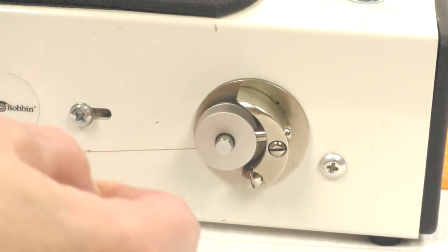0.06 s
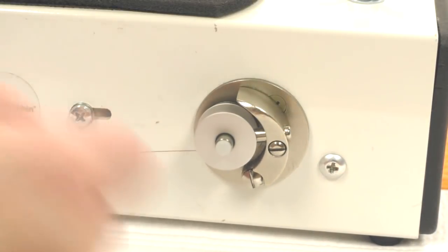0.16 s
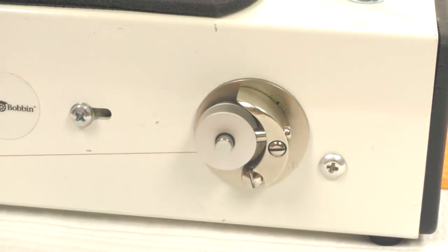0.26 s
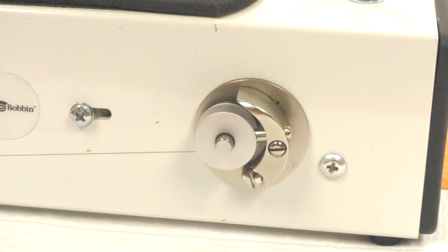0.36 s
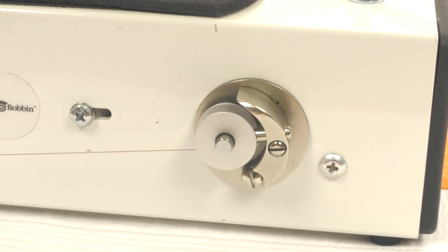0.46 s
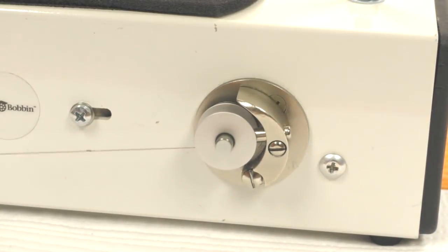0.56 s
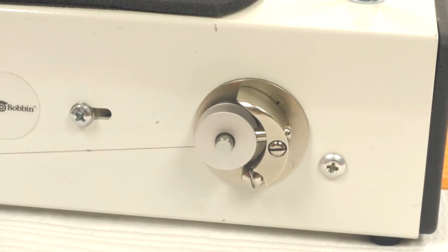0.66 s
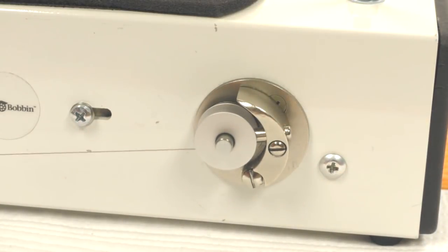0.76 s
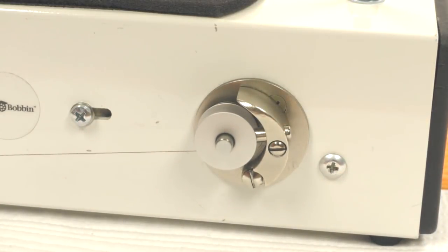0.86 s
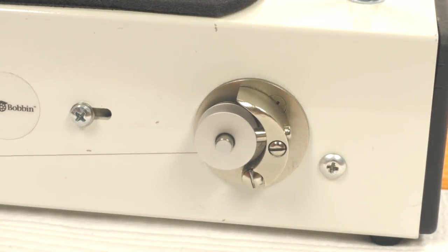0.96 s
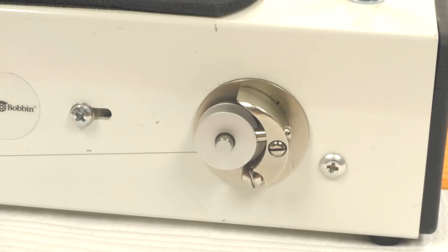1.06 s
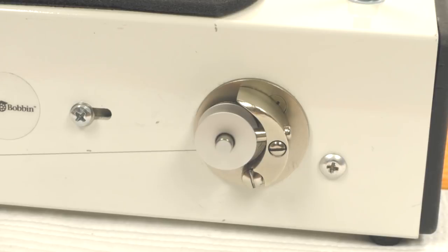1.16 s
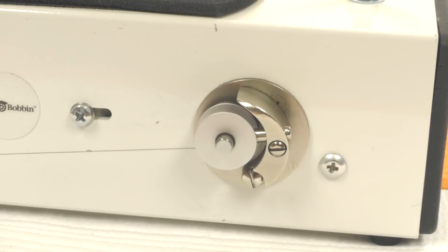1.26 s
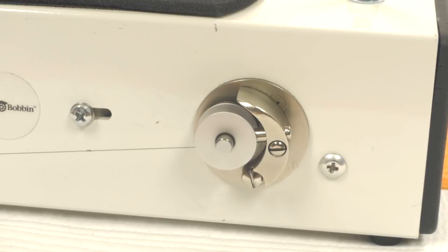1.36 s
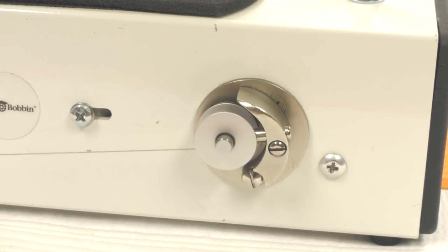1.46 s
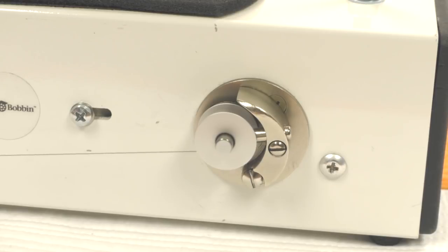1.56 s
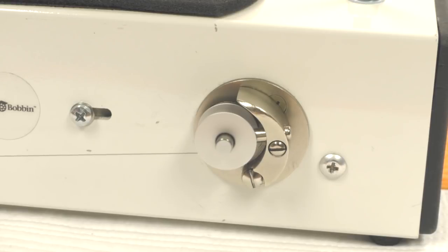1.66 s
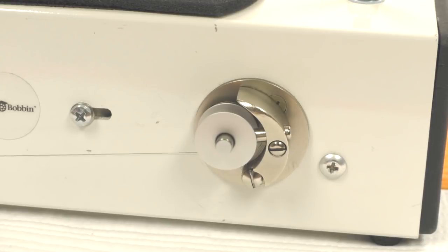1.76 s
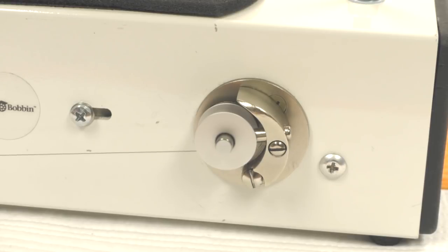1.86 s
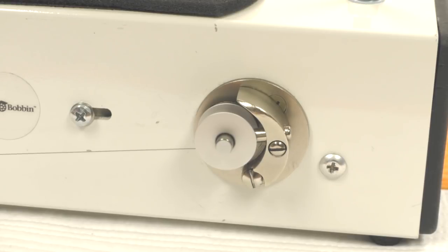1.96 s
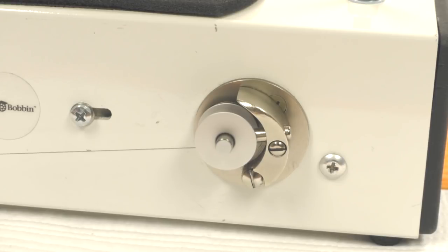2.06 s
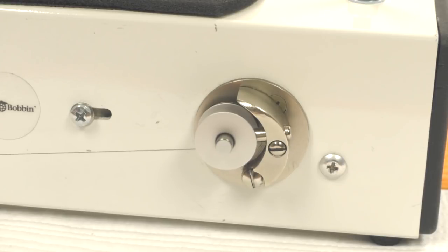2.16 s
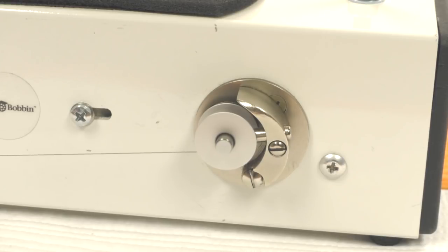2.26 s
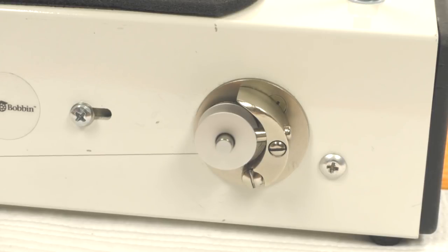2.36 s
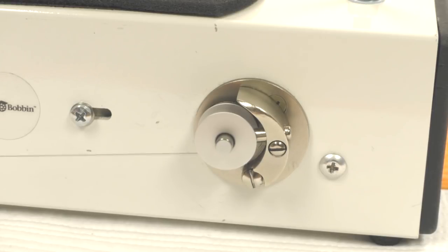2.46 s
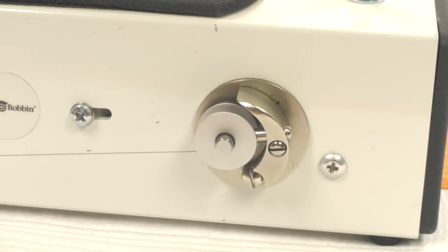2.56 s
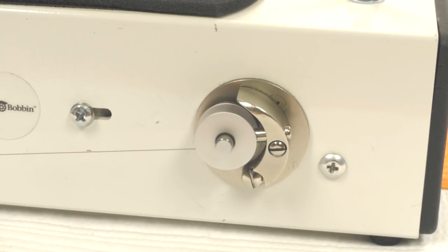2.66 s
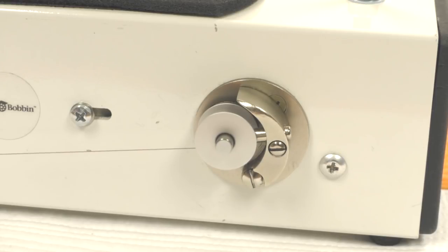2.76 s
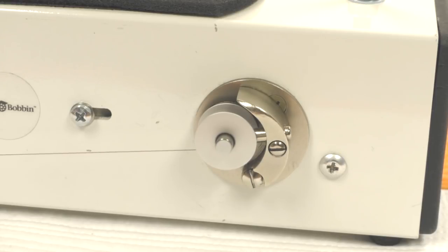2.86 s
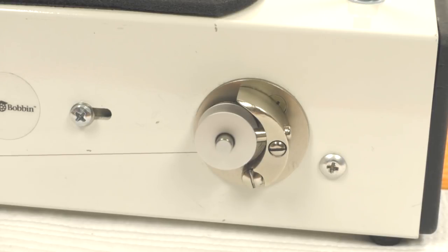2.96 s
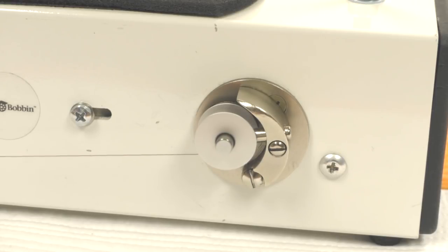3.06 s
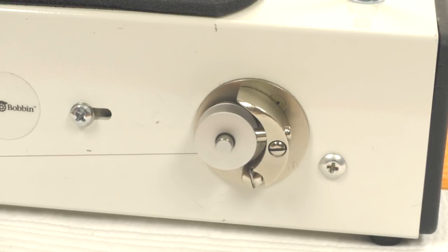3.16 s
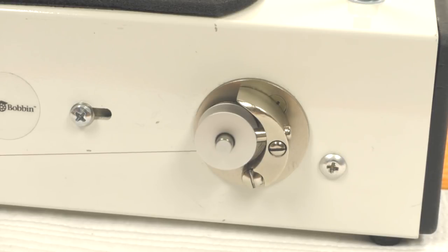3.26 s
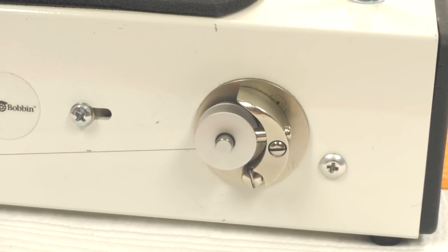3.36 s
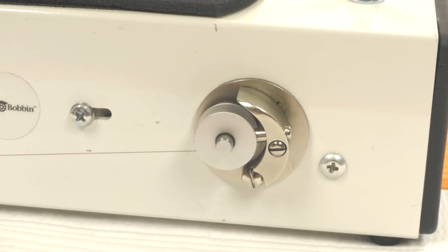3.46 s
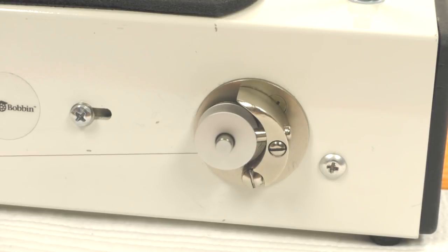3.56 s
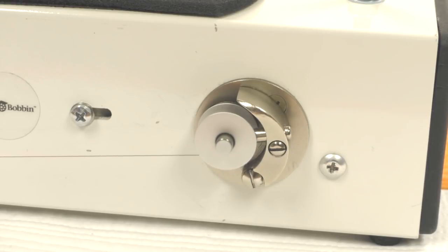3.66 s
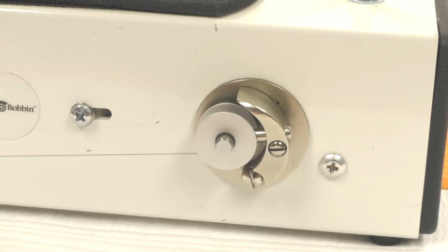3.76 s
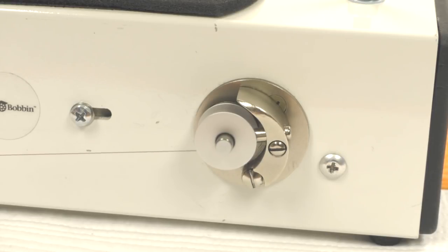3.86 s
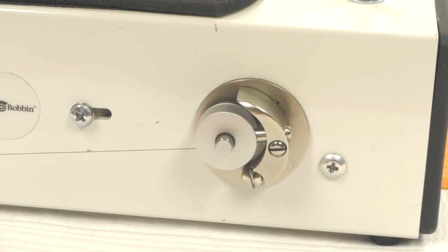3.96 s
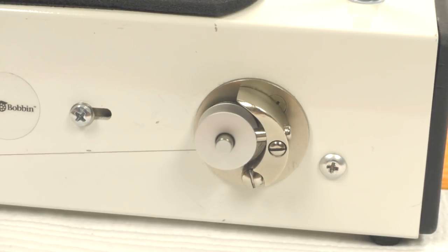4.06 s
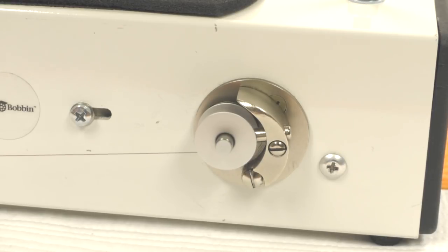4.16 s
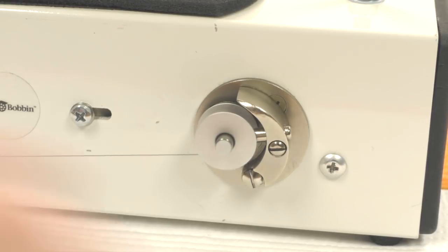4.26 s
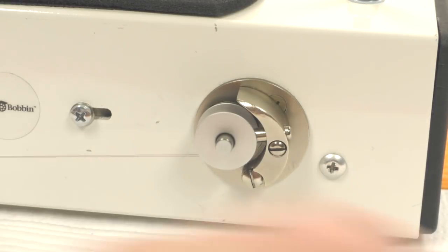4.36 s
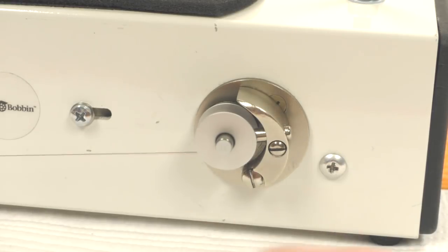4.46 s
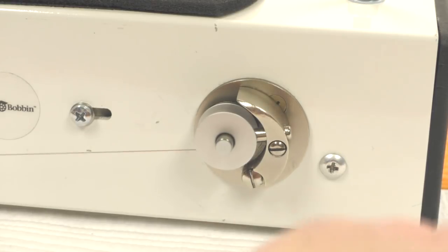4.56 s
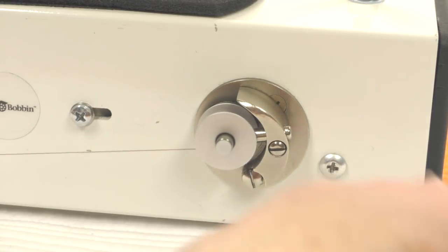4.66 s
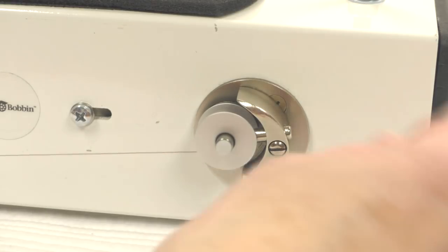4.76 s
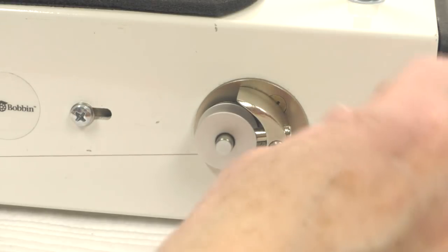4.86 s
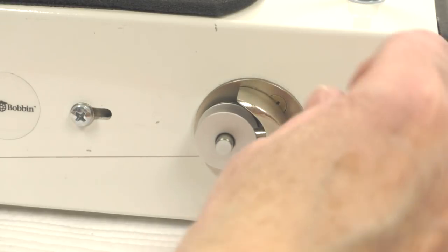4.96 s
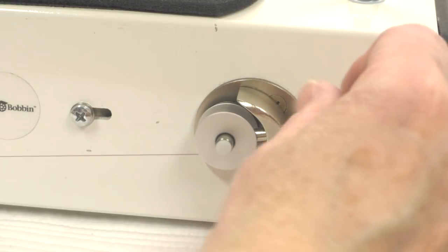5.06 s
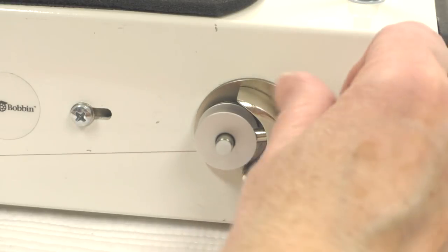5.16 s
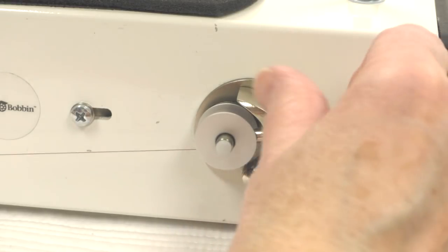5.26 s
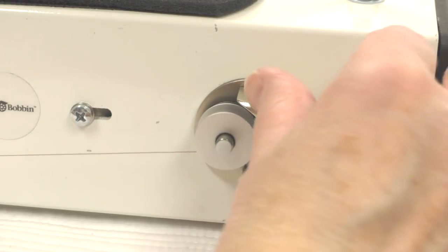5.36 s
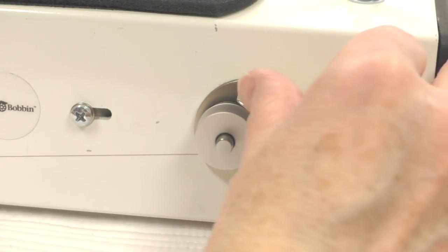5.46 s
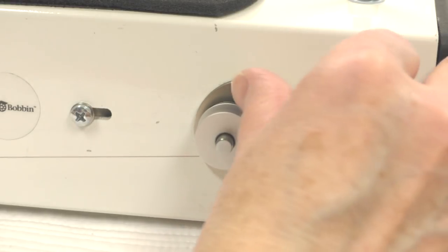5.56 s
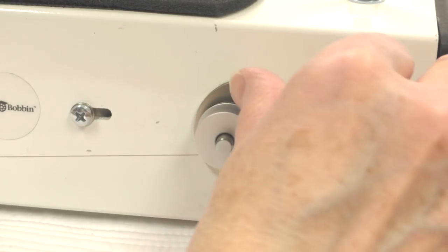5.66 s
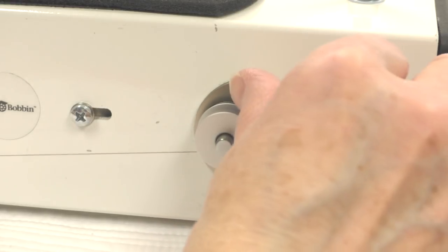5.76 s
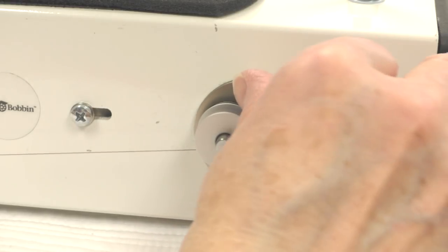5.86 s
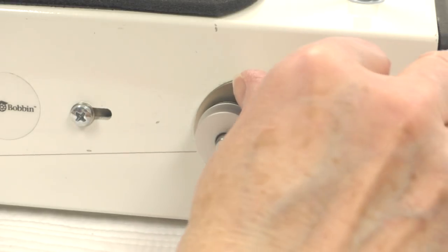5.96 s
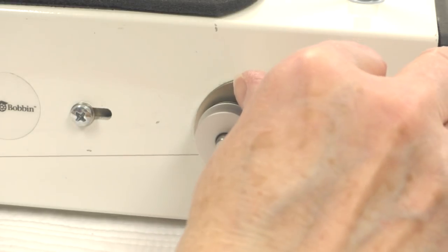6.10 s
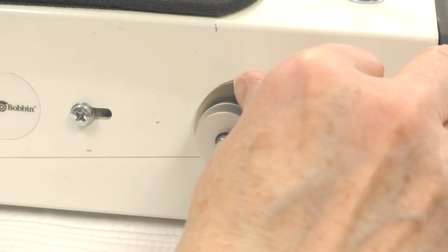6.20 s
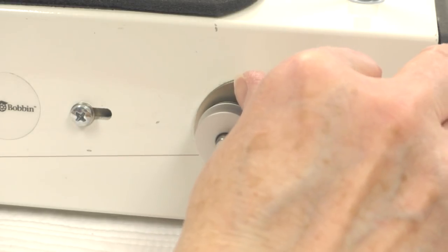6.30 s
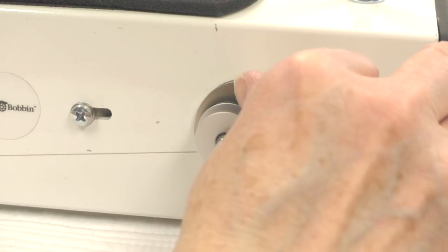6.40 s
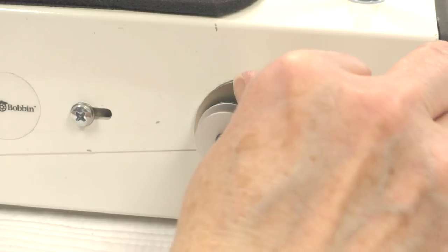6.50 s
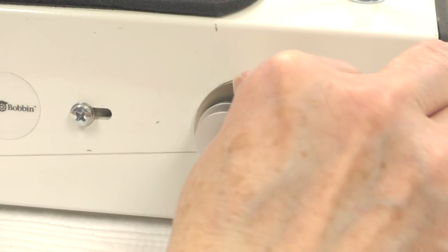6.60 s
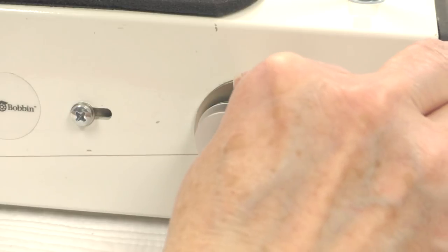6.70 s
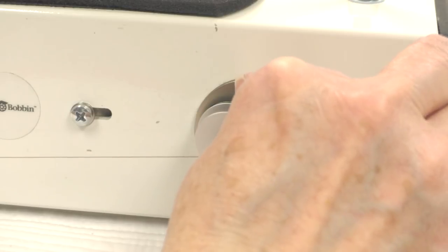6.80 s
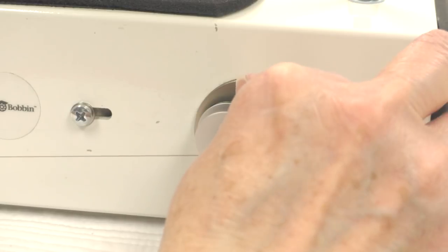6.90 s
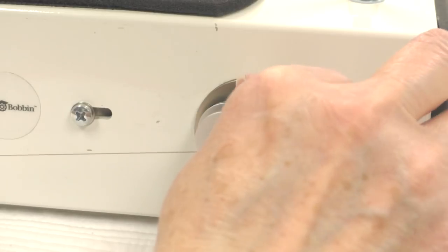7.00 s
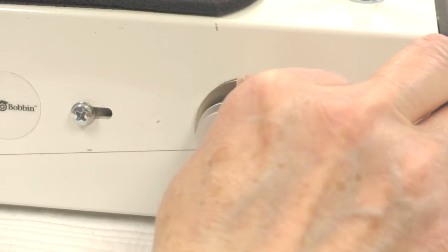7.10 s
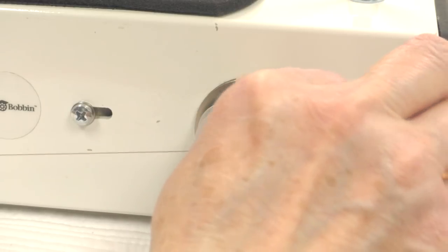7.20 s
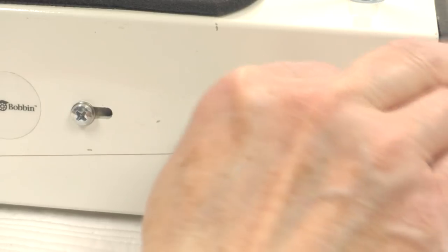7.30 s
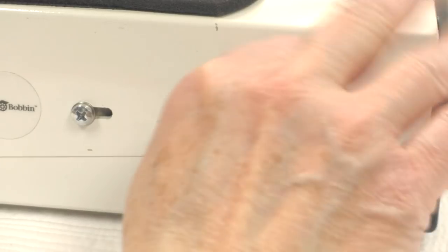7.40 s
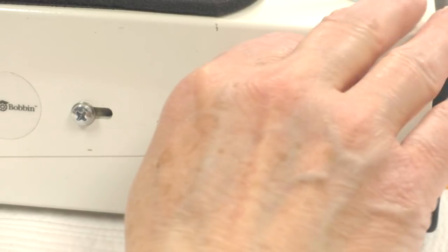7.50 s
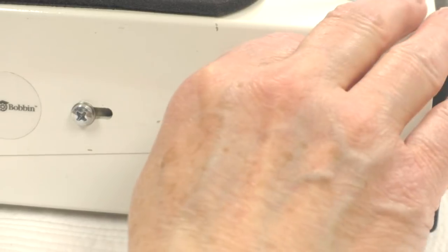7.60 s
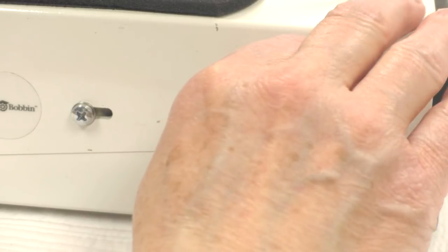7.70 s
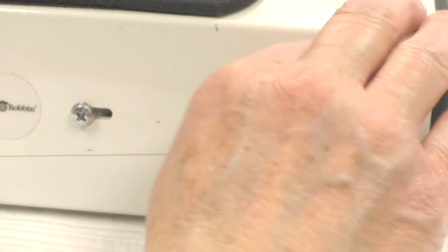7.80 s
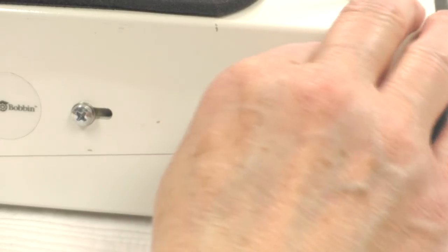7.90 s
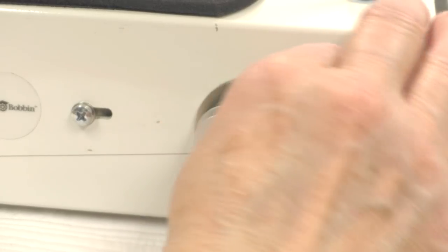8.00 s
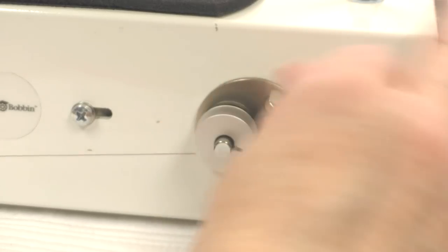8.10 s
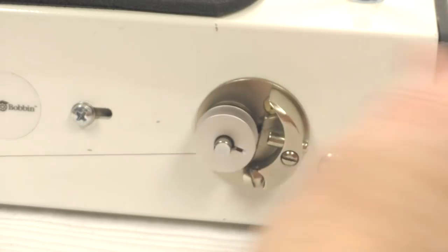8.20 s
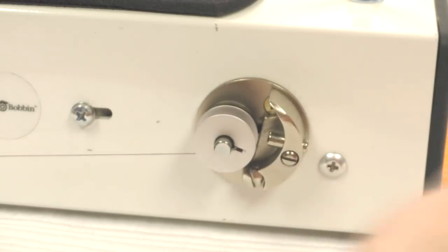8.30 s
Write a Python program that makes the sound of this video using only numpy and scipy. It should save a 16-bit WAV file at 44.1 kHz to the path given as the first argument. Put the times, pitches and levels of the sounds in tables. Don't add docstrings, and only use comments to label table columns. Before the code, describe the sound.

From 0 s a small brush motor is already running, close and dry in a quiet room: gritty belt rumble centred in the mids, a low buzzing whine and airy brush hiss, shaking a thin metal case. Until about 0.9 s a moving hand adds soft low thumps and air buffeting, with several loose spindle knocks. The whir then settles slightly quieter, pitch creeping upward. Bright tiny thread ticks come in short waves roughly every 0.7 s; knocks thin out between 2.4 and 4.6 s. From about 4.7 s the hand returns, stirring air, colouring the hiss and bringing a fuller, louder whir with more frequent knocks and sharper, drier ticks through 7.7 s. At 7.84 s a lever snaps with a hard metallic double click and small rattle. Rumble and hiss vanish quickly, leaving a clean whine gliding down in pitch, with faint hand bumps, still sounding at the end near 8.3 s.

```python
import sys
import numpy as np
from scipy import signal
from scipy.fft import rfft, irfft, next_fast_len
from scipy.io import wavfile
from scipy.ndimage import map_coordinates

SR = 44100
rng = np.random.default_rng(int(sys.argv[2]) if len(sys.argv) > 2 else 0)


def digitize_waveform(pressure):
    field = np.atleast_2d(pressure).T
    bounded = np.clip(field, -1, 1)
    quanta = np.round(bounded * 32767).astype(np.int16)
    wavfile.write(sys.argv[1], SR, quanta)


def voltage_ratio(decibels):
    exponent = np.asarray(decibels, float) / 20
    return 10 ** exponent


N = 367838
T = np.arange(N) / SR

# time in seconds, commutator steps per second.
SPEED = [(0, 201.5), (.4, 205.3), (.6, 206.6), (1.5, 208.3), (3, 211.6), (5.5, 217.1), (7.2, 220.7),
         (7.85, 221.9), (8.22, 164.5), (8.34, 147.6)]
BOBBIN_TURNS, BELT_TURNS = .3466, 1 / 9.25
# frequency in Hz, level in dB per Hz.
LOWER_BAND = [(180, -58), (300, -20.5), (328, -24), (417, -6.5), (433, -19), (477, -24.5), (506, -16.5),
              (575, -4), (671, -10), (725, -8.5), (869, -7.5), (1000, 1.5), (1120, 3), (1350, -13),
              (1400, -8.5), (1820, -36), (3080, -120)]
# time in seconds, peak in dB.
KNOCKS = [(0.1181, -17), (0.171, -17), (0.189, -11.5), (0.3125, -14), (0.3701, -15), (0.412, -12),
          (0.4419, -17), (0.7752, -16), (1.2565, -15.5), (1.3443, -20), (1.5244, -15), (1.5663, -16),
          (1.5893, -12.5), (1.9265, -19), (2.0832, -17), (2.0971, -12.5), (2.2619, -17), (2.3166, -19),
          (2.825, -28), (4.68, -18), (4.8745, -18), (4.8973, -14), (5.0746, -16), (5.1856, -17),
          (5.3737, -16), (5.3944, -12), (5.4993, -18), (5.7059, -16), (5.8381, -20), (5.862, -17),
          (5.9838, -14), (6.2442, -22), (6.3064, -16), (6.3495, -17), (6.451, -13), (6.662, -13),
          (6.8763, -14), (6.9755, -14), (7.0683, -16), (7.1077, -12.5), (7.1668, -18), (7.2712, -12),
          (7.5384, -25), (7.5905, -20)]
# time in seconds, case ring in dB, sharp crack in dB.
SNAPS = [
    (7.8388, -11, -33),
    (7.843, -4, -23.5),
    (7.8466, -22, -29),
    (7.853, -12, -35),
    (7.856, -22, -39),
    (7.863, -23, -42),
]
LET_GO_S = SNAPS[0][0]
# time in seconds, colour (0 open, 1 mid, 2 hand).
HISS_MOVE = [(1.7, 0), (2.05, 1), (3.9, 1), (4.9, 2)]


def unit(x):
    return x / np.sqrt(np.mean(x ** 2) + 1e-20)


def curves(rows):
    s, *cols = np.transpose(rows)
    return [np.interp(T, s, c) for c in cols]


def wobble(rate):
    knots = rng.standard_normal(int(N * rate / SR) + 4)
    coarse = map_coordinates(knots, [T[::16] * rate])
    return np.interp(T, T[::16], coarse)


def swells(rows, edge):
    s, length, *heights = np.transpose(rows)
    t = T[::16, None]
    shape = np.clip(np.minimum(t - s, s + length - t) / edge + .5, 0, 1)
    return [np.interp(T, T[::16], shape @ h) for h in heights]


def coloured(x, spectrum):
    m = 2 * next_fast_len(N // 2 + 4096)
    f, db = np.transpose(spectrum)
    gain_db = np.interp(np.log(np.fft.rfftfreq(m, 1 / SR) + 1), np.log(f + 1), db)
    cepstrum = irfft(np.log(voltage_ratio(gain_db) + 1e-6), m)
    cepstrum[1:m // 2] *= 2
    cepstrum[m // 2 + 1:] = 0
    return irfft(rfft(x, m) * np.exp(rfft(cepstrum)), m)[:N]


def noise(spectrum):
    return unit(coloured(rng.standard_normal(N), spectrum))


def rings(times, hz, gain, t60, size, attack=0.00053):
    t = np.arange(size) / SR
    envelope = voltage_ratio(-60 * t / t60) * (1 - np.exp(-t / attack))
    rows = gain[:, None] * np.sin(2 * np.pi * hz[:, None] * t) * envelope
    at = np.round(times * SR).astype(int)[:, None] + np.arange(size)
    return np.bincount(at.ravel(), rows.ravel(), N + size)[:N]


def steps():
    return np.cumsum(curves(SPEED)[0]) / SR


def relief(turns, size):
    laps = rng.standard_normal((13, size))
    return unit(map_coordinates(laps, [T / T[-1] * 12, turns % 1 * size], order=1, mode="grid-wrap"))


def orders(table, turns):
    tones = 0
    for k, early_db, late_db in table:
        level_db = np.interp(T, [1.8, 6.2], [early_db, late_db]) + 0.73 * wobble(5)
        tones = tones + voltage_ratio(level_db) * np.sin(2 * np.pi * round(k) * turns + 0.87 * wobble(3))
    return np.sqrt(2) * tones


def levels():
    # time in seconds, case level in dB, brightness in dB.
    drive_rows = [(0, -30.5, -20), (.45, -29, -22), (.53, -33.5, -19), (1.1, -31.5, -20.5),
                  (2.3, -31.5, -21.5), (3.6, -32.5, -21), (4.1, -32, -19), (4.72, -32.5, -16),
                  (4.9, -29, -19.5), (5.35, -26, -19.5), (5.8, -28.5, -17.5), (6.6, -29, -17),
                  (7.1, -28, -17.5), (7.83, -28, -18.5)]
    main_db, bright_db = curves(drive_rows)
    lower_db = -37.5 + 0.6 * (main_db - main_db.mean())
    upper_db = main_db + bright_db
    hiss_db = upper_db
    return main_db, lower_db, upper_db, hiss_db


def drive():
    # frequency in Hz, level in dB per Hz.
    main_band = [(760, -43), (1300, -17.5), (1360, -17.5), (1570, -2.5), (1850, -0.5), (2350, -20.5),
                 (2600, -31), (3380, -57.5), (5720, -120)]
    # frequency in Hz, level in dB per Hz.
    upper_open = [(1410, -26.5), (2400, -5), (2820, -7), (3110, -10.5), (3220, -25), (3420, -9),
                  (3670, -9.5), (3950, -16), (4950, -8.5), (5800, -11), (7540, -21), (12800, -120)]
    # frequency in Hz, level in dB per Hz.
    upper_hand = [(1410, -22.5), (2400, 4), (2790, 0.5), (3380, 5), (3600, 3.5), (3790, -8.5), (4110, -5.5),
                  (4410, -12.5), (4890, -2), (5800, -31), (7540, -29), (12800, -120)]
    # time in seconds, share of the shaded colour from 0 to 1.
    hand_share = [(1.6, 0), (2.6, 0.65), (4.6, 0.24), (5, 0.7)]
    # lumps per turn, phase in turns, early depth in dB, late depth in dB.
    throb = [(2, .16, 1.8, .6), (4, .1, 1.2, .5)]
    # time in seconds, phase in turns.
    lower_lag = [(0, .08), (2.4, -.1), (4.8, -.23)]
    # bumps per belt turn, early level in dB, late level in dB.
    belt_orders = [(8, -70, -71), (24, -59, -56), (25, -55, -50), (26, -62, -60), (27, -61, -58),
                   (29, -63, -63), (30, -69, -58), (31, -57, -55), (32, -61, -58), (33, -59, -61),
                   (35, -58, -53), (39, -61, -55), (42, -58, -48), (43, -55, -50)]
    # bumps per bobbin turn, early level in dB, late level in dB.
    bobbin_orders = [(1, -67, -68), (5, -63, -64), (6, -63, -64), (7, -68, -65), (8, -60, -59),
                     (9, -66, -64), (10, -59, -58), (11, -60, -60)]
    # cycles per step, early level in dB, late level in dB.
    step_orders = [(1, -68, -66), (4, -57, -58), (8, -54, -48), (9, -53, -54)]
    # time in seconds, change in dB.
    release = [(7.84, 0), (7.863, 0), (7.869, -6.5), (7.89, -10.5), (7.92, -24), (7.97, -33), (8.05, -47)]

    main_db, lower_db, upper_db, _ = levels()
    belt_turns = steps() * BELT_TURNS
    belt = relief(belt_turns, size=600)
    lumps = voltage_ratio(0.54 * wobble(220) + 0.4 * wobble(25))

    def scrape():
        return unit(lumps * rng.standard_normal(N))

    main = unit(coloured(scrape() + 0.43 * belt * lumps, main_band))
    for s, _ in KNOCKS:
        start = max(round((s - .006) * SR), 0)
        main[start:][:520] *= 1 - .8 * np.hanning(520)
    throb_db = 0
    for k, lag, early_db, late_db in throb:
        depth_db = np.interp(T, [3, 5], [early_db, late_db])
        throb_db = throb_db + depth_db * np.cos(2 * np.pi * k * (belt_turns - lag))
    main *= voltage_ratio(throb_db)

    lower = voltage_ratio(-0.5) * unit(coloured(scrape() + 0.23 * belt, LOWER_BAND))
    lower *= voltage_ratio(2.4 * np.cos(4 * np.pi * (belt_turns - curves(lower_lag)[0])))

    hand = np.clip(curves(hand_share)[0], 0, 1)
    upper = np.sqrt(1 - hand) * unit(coloured(scrape(), upper_open))
    upper += np.sqrt(hand) * unit(coloured(scrape(), upper_hand))

    tones = orders(belt_orders, belt_turns) + orders(bobbin_orders, steps() * BOBBIN_TURNS)
    tones += orders(step_orders, steps())
    body = voltage_ratio(main_db) * main + voltage_ratio(lower_db) * lower + voltage_ratio(upper_db) * upper + voltage_ratio(.4) * tones
    return voltage_ratio(curves(release)[0]) * (body + brushes())


def whine():
    # time in seconds, second order in dB, third order in dB.
    load_levels = [(0, -42, -50), (.5, -47, -49.5), (1.2, -47.5, -53), (2.7, -48, -51), (3.6, -54, -52),
                   (4.6, -59, -56), (5.8, -53.5, -55), (7.8, -57, -57), (7.88, -73, -88)]
    # order, level in dB, change in dB per second.
    coast = [(1, 2, 0), (2, 16, -14), (3, 16, -5), (4, 7, 0), (5, 0, -20), (6, -6, -8), (7, 12, -48),
             (8, 9, -22), (9, -7, 8), (10, -14, 36), (11, 4, 4), (12, -4, 20), (13, 9, -20), (14, 9, -45),
             (15, 5, -35), (16, 11, -70), (17, 7, -10), (18, 1, 8), (24, 8, 14), (31, 8, -30),
             (36, 18, -15), (43, 9, -25), (48, 8, 10), (52, 5, 0)]
    # frequency in Hz, level in dB.
    case_top = [(1300, -74), (1490, -72), (1600, -60), (2000, -59), (2300, -66), (2700, -78), (3400, -86),
                (3750, -97), (3950, -85), (4200, -96), (4600, -97), (8500, -82), (10500, -96)]

    second_db, third_db = curves(load_levels)
    turn = 2 * np.pi * steps()
    out = voltage_ratio(second_db + 0.44 * wobble(20.6)) * np.sin(2 * turn)
    out += voltage_ratio(third_db + 1.5 * wobble(9)) * np.sin(3 * turn)

    free = T > LET_GO_S
    since = T[free] - LET_GO_S
    k = np.arange(1, 59)[:, None]
    extra_db = sum((db + change_db * since) * (k == round(order)) for order, db, change_db in coast)
    knots = rng.standard_normal((len(k), 14))
    swell = map_coordinates(knots, [k - 1 + 0 * since, 0 * k + 1 + 22 * since], order=1)
    swell_db = 4.5 * swell * np.where(extra_db > 8, .45, 1)

    hz = k * curves(SPEED)[0][free]
    lower, upper = [voltage_ratio(np.interp(np.log(hz), np.log(f), db))
                    for f, db in (np.transpose(LOWER_BAND), np.transpose(case_top))]
    low_case = voltage_ratio(-61.5) * np.where(hz < 480, voltage_ratio(-18), lower)
    case = np.where(hz < case_top[0][0], low_case, upper)
    fade_db = .4 * k * since
    phase = rng.uniform(0, 2 * np.pi, k.shape)
    stack = case * voltage_ratio(extra_db - fade_db + swell_db) * np.sin(k * turn[free] + phase)
    slip = np.clip(since / .07, 0, 1) ** 2
    out[free] += slip * stack.sum(0)
    return np.sqrt(2) * out


def brushes():
    # frequency in Hz, level in dB per Hz.
    hiss_open = [(2940, -30), (5000, -3), (5900, 2), (7060, 5.5), (7900, -2.5), (9460, -10.5), (10700, -26),
                 (13200, -21), (14300, -36), (15200, -25), (16000, -25)]
    # frequency in Hz, level in dB per Hz.
    hiss_mid = [(2940, -40), (5000, -1.5), (5840, -10), (6470, 0.5), (7450, -4), (8460, 2.5), (9100, -5.5),
                (9830, -32), (10700, -32), (15200, -23), (16000, -32)]
    # frequency in Hz, level in dB per Hz.
    hiss_hand = [(2940, -39), (5000, -7.5), (5990, -7.5), (7670, 3), (8290, -3.5), (9100, -1.5),
                 (10700, -23), (13000, -25), (14300, -40), (15200, -24), (16000, -30)]
    sputter = voltage_ratio(2.36 * wobble(400)) * rng.standard_normal(N)
    move = curves(HISS_MOVE)[0]
    hiss = 0
    for k, colour in enumerate((hiss_open, hiss_mid, hiss_hand)):
        hiss = hiss + np.clip(1 - abs(move - k), 0, 1) * unit(coloured(sputter, colour))
    return voltage_ratio(levels()[-1] - 0.5) * hiss


def panels(x):
    # frequency in Hz, width in Hz, gain in dB.
    panel_rows = [(1365, 22, -2.5), (1550, 16, 1), (1840, 15, 2), (2610, 31, 3.5), (2975, 26, -3),
                  (3040, 25, 3.5), (3136, 35, -6), (3265, 30, 3), (3440, 31, 2), (4000, 40, 4.5),
                  (4710, 25, -7), (4920, 32, 1.5), (5200, 40, -4), (5880, 40, -3)]
    m = next_fast_len(N + 4096)
    hz = np.fft.rfftfreq(m, 1 / SR)
    gain_db = sum(db * np.exp(-.5 * ((hz - centre) / width) ** 2) for centre, width, db in panel_rows)
    return irfft(rfft(x, m) * voltage_ratio(gain_db), m)[:N]


def thread():
    # start in seconds, length in seconds, then lifts in dB of ticks, bright rub, top rub.
    passes = [(-.05, 0.28, 7.5, -2, 0), (.52, 0.37, 7, 4, 1), (1.22, 0.42, 6.5, 7, -4),
              (1.96, 0.35, 8.5, -4, 2), (2.67, 0.35, 8, -4, 0), (3.34, 0.23, 9.5, -8, -1),
              (3.93, 0.25, 8.5, -1, 1), (4.5, 0.25, 3, 1, -2), (4.75, .15, 0, -5, 12),
              (5.2, 0.39, 3.5, -4, -1), (5.82, 0.34, 7.5, 0, 3), (6.44, 0.26, 10.5, 0, 3),
              (7.06, 0.27, 7, 2, 0), (7.68, .3, 11, -5, -1)]
    # time in seconds, frequency in Hz.
    rim_pitch = [(0, 7800), (.4, 7060), (1.8, 6870), (2, 8160), (4.65, 8370), (4.85, 7440), (7.8, 7940)]
    # bright rub in dB, top rub in dB.
    rim_rub = [(-15.5, -25), (-17.5, -20), (-16.5, -23)]
    # time in seconds, peak in dB, frequency in Hz.
    hard_ticks = [(0.0537, -30, 7100), (0.1241, -30, 7440), (0.1386, -30, 7370), (0.1665, -31, 7020),
                  (0.4, -29.5, 6830), (0.5576, -34, 7380), (0.8506, -35, 7280), (1.3339, -34, 6600),
                  (1.6048, -30, 6730), (1.9688, -32, 8150), (1.9959, -33, 8280), (2.0236, -31, 8140),
                  (2.0911, -33, 8320), (2.133, -34, 8300), (2.1874, -32, 8090), (2.2149, -31, 8300),
                  (2.578, -40, 8490), (2.6798, -36, 8430), (2.7077, -30, 8240), (2.7622, -31, 8320),
                  (2.7886, -34, 8310), (2.817, -32, 8300), (2.953, -39, 8330), (2.9796, -38, 8300),
                  (3.3743, -33, 8410), (3.4416, -31, 8330), (3.496, -32, 8440), (3.955, -31, 8510),
                  (3.9948, -27, 8000), (4.5974, -31, 8440), (4.6379, -30, 8720), (4.7795, -37, 7120),
                  (5.2779, -30, 8000), (5.3313, -26, 7810), (5.7573, -35, 7220), (6.0072, -29, 7810),
                  (6.0606, -25, 7300), (6.1403, -22, 7430), (6.3624, -32, 7820), (6.47, -28, 7520),
                  (6.5096, -23, 7800), (6.535, -29, 7580), (6.5879, -27, 8000), (7.0885, -20, 7570),
                  (7.1651, -26, 7670), (7.2175, -33, 7570), (7.231, -27, 7240), (7.7273, -33, 8200),
                  (7.7804, -25, 7540)]
    # frequency in Hz, level in dB per Hz.
    bright_band = [(5760, -8), (9800, -2.5), (10800, -10), (14000, -13.5), (15000, -23)]
    # frequency in Hz, level in dB per Hz.
    top_band = [(8240, -27), (14000, -6), (15100, 2), (16000, 3)]

    lift_db, bright_db, top_db = swells(passes, edge=0.13)
    move = curves(HISS_MOVE)[0]
    rub_db = [np.interp(move, np.arange(len(rim_rub)), c) for c in np.transpose(rim_rub)]
    bright_db, top_db = bright_db + rub_db[0], top_db + rub_db[1]
    hard_s, hard_db, hard_hz = np.transpose(hard_ticks)

    laps = steps() * BOBBIN_TURNS
    snag = np.unwrap(np.interp(hard_s, T, laps) % 1, period=1)
    slip = np.interp(T, hard_s, snag)
    turns = np.flatnonzero(np.diff(np.floor(laps - slip))) / SR
    turns = np.resize(np.append(turns, np.full(60, 8.)), 620)
    times = np.concatenate([np.minimum(turns, 8), rng.uniform(0, LET_GO_S, 1200)])
    luck = rng.standard_normal((len(times), 3))
    times = np.abs(times + .0003 * luck[:, 0])
    stray = np.arange(len(times)) >= len(times) - 1200
    at = (times * SR).astype(int)

    hiss_db = levels()[-1]
    level_db = hiss_db - 0.5 + lift_db
    excess = np.sqrt(np.clip(voltage_ratio(level_db) ** 2 - voltage_ratio(hiss_db - .5) ** 2, 1e-8, None))
    turn_db = np.interp(times, [4.3, 5.2], [2.5, 3]) * luck[:, 1]
    size = voltage_ratio(np.where(stray, -11 + 4.5 * luck[:, 1], turn_db))
    size *= (abs(times[:, None] - hard_s).min(1) > .003) & (times < LET_GO_S)
    pitch_hz = curves(rim_pitch)[0][at] * (1 + .03 * luck[:, 2])
    life = np.interp(times, [3.5, 4, 5.2], [.0052, .0033, .0024])[:, None]
    hard_life = np.interp(hard_s, [3.5, 5.2], [.0048, .0032])[:, None]

    ring = rings(times, pitch_hz, excess[at] * size * voltage_ratio(18.5), life, size=300, attack=life / 9)
    ring += rings(hard_s, hard_hz, voltage_ratio(hard_db + 6.0), hard_life, size=300, attack=0.00031)
    puffs = rings(times, np.full(len(times), 150.), size * voltage_ratio(30.0), t60=0.0034, size=150)
    hard_puff = voltage_ratio(hard_db + 16 - level_db[(hard_s * SR).astype(int)])
    puffs += rings(hard_s, np.full(len(hard_s), 150.), hard_puff, t60=0.0046, size=150)
    rub = voltage_ratio(level_db - 2.5) * (puffs + 0.42) * (T < LET_GO_S)
    return ring + rub * (voltage_ratio(bright_db) * noise(bright_band) + voltage_ratio(top_db - 0.5) * noise(top_band))


def reflected(x):
    # time in seconds, frequency in Hz, gain in dB.
    cancels = [(.4, 8750, -7), (.55, 8630, -9), (.9, 8600, -10), (1.1, 8600, 3.5), (2.2, 4000, -1.5),
               (4.2, 3970, -5), (4.7, 4300, -7), (5.2, 4800, -13), (5.7, 4600, -10), (6.4, 4440, -5),
               (7.8, 4420, -1)]
    # time in seconds, frequency in Hz, gain in dB.
    adds = [(0, 12600, 7), (.22, 12000, -2), (.55, 9500, 5.5), (1, 9650, 2), (1.25, 9400, 1),
            (1.7, 9500, 1), (3.85, 5500, 0), (4.1, 5500, 4.5), (4.25, 5400, 1.5), (4.3, 9700, 2),
            (4.55, 10200, 3.5), (4.95, 12300, 4), (5.3, 12700, 9), (5.6, 12500, 1)]
    hz, t, z = signal.stft(x, SR, nperseg=512)
    gain_db = 0
    for rows, width_hz in ((cancels, 170), (adds, 1100)):
        s, centre_hz, db = np.transpose(rows)
        away = (hz[:, None] - np.interp(t, s, centre_hz)) / width_hz
        gain_db = gain_db + np.interp(t, s, db, left=0) * np.exp(-.5 * away ** 2)
    return signal.istft(z * voltage_ratio(gain_db), SR, nperseg=512)[1][:N]


def knocks():
    # frequency in Hz, level in dB, time to fade 60 dB in seconds.
    lever = [(950, -16.5, 0.037), (1755, -2.5, .03), (1870, -6, 0.028), (2950, -19, 0.023),
             (3340, -27, .03)]
    # frequency in Hz, level in dB per Hz.
    crack_band = [(1760, -25), (3000, 2), (3220, -25.5), (3900, -1), (4370, -13), (7440, 7.5),
                  (10800, -12.5), (15400, -20), (16300, -33)]
    # time in seconds, frequency in Hz, level in dB, time to fade
    # 60 dB in seconds.
    thumps = [(.03, 170, -48, .1), (.12, 175, -49, .1), (.26, 210, -50, .1), (8.21, 110, -58, .1),
              (8.31, 90, -54, .1), (.1, 71.6, -44, 0.14), (.29, 55, -42, 0.091), (.44, 45, -44, .09),
              (.6, 75, -57, 0.091), (.7, 50, -39, .08), (.815, 110, -46, 0.087), (.02, 50.4, -43, 0.34),
              (.85, 55, -46, .25), (5.48, 48, -43, 0.32), (7.9, 189, -45, 0.16), (8.17, 340, -57, .1),
              (8.181, 478, -53, 0.072), (8.28, 170, -53, .15)]

    s, db = np.transpose(KNOCKS)
    knock_hz = 1800 * (1 + 0.042 * rng.standard_normal(len(s)))
    out = rings(s, knock_hz, voltage_ratio(db + 1.0), t60=0.018, size=1200, attack=0.00071)

    s, case_db, crack_db = np.transpose(SNAPS)
    for hz, db, t60 in lever:
        lever_hz = hz * (1 + 0.015 * rng.standard_normal(len(s)))
        out += rings(s, lever_hz, voltage_ratio(case_db + db), t60, size=3000)
    burst = rings(s, np.full(len(s), 120.), voltage_ratio(crack_db + 12.5), t60=0.014, size=800)
    crack = burst * rng.standard_normal(N)
    white = rng.standard_normal(N)
    out += coloured(crack, crack_band) / np.std(coloured(white, crack_band))

    for s, hz, db, t60 in thumps:
        gain = voltage_ratio(np.array([db + 6.5]))
        out += rings(np.array([s]), np.array([hz]), gain, t60, size=6000, attack=1 / hz)
    return out


def air():
    # start in seconds, length in seconds, buffet lift in dB, murmur lift in dB.
    gusts = [(-.05, 0.25, 17, 12.5), (.24, 0.1, 14, 19.5), (.41, 0.26, 17.5, 15.5), (.72, .2, 8, 7),
             (1.72, 0.46, 8, -1), (3.95, 0.33, 9, 5.5), (4.33, 0.15, 8, 7), (4.75, 0.55, 9, 8.5),
             (5.45, 0.15, 9, 7), (5.8, 1.65, 4.5, -1), (6.15, .15, 4, 5), (7.5, 0.35, 7.5, 0),
             (7.82, 0.1, 6, 12), (8.14, 0.082, 14, 3), (8.26, 0.078, 9, 5)]
    # frequency in Hz, level in dB per Hz.
    buffet_band = [(8.8, -32), (15, 5), (59, 0), (140, -16), (180, -40), (310, -120)]
    # frequency in Hz, level in dB per Hz.
    room_band = [(59, -39), (100, -6.5), (195, -9), (231, -11.5), (285, -8.5), (324, -18.5), (350, -8.5),
                 (460, -15), (770, -120)]
    # frequency in Hz, level in dB per Hz.
    floor_band = [(150, -54), (250, -3.5), (360, -12), (460, -16), (640, -1), (845, -16), (1330, -8),
                  (1980, -10.5), (2620, -28), (4650, -31.5), (8850, -17.5), (10500, -32), (16000, -29)]

    gust_db, stir_db = swells(gusts, edge=.05)
    buffet_db = -62.5 + gust_db + 1.2 * wobble(7.3)
    room_db = -64.5 + stir_db + 1.4 * wobble(6.6)
    buffet = unit(coloured(voltage_ratio(2.0 * wobble(16)) * rng.standard_normal(N), buffet_band))
    floor = voltage_ratio(-58) * noise(floor_band)
    floor += voltage_ratio(-86.5 + 3 * wobble(4)) * np.sin(2 * np.pi * 13668 * T + 1.5 * wobble(30))
    return voltage_ratio(buffet_db) * buffet + voltage_ratio(room_db) * noise(room_band) + floor


def scene():
    near_hand = reflected(panels(drive()) + thread())
    return (whine() + near_hand + knocks() + air())[None]


def low_pass(x):
    return signal.sosfilt(signal.butter(12, 16490, fs=SR, output="sos"), x)


def record(dry):
    # frequency in Hz, gain in dB.
    capsule = [(15250, 0), (15700, 6), (15750, -4), (15830, -6)]
    top_hz, snap_top_hz = 15830, 16450
    m = next_fast_len(N)
    hz = np.fft.rfftfreq(m, 1 / SR)
    f, db = np.transpose(capsule)
    spectrum = rfft(dry, m)
    band = irfft(spectrum * (hz < top_hz) * voltage_ratio(np.interp(hz, f, db)), m)[:, :N]
    opened = np.exp(-((T - SNAPS[1][0]) / .004) ** 2)
    extra = irfft(spectrum * (hz >= top_hz) * (hz < snap_top_hz), m)[:, :N]
    return low_pass(band + opened * extra)


dry = scene()
out = record(dry)
digitize_waveform(out)
```